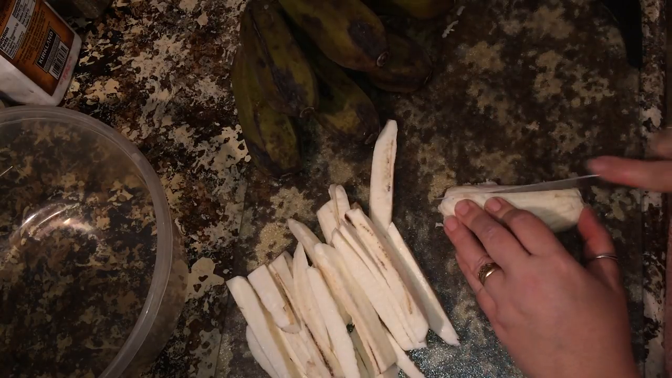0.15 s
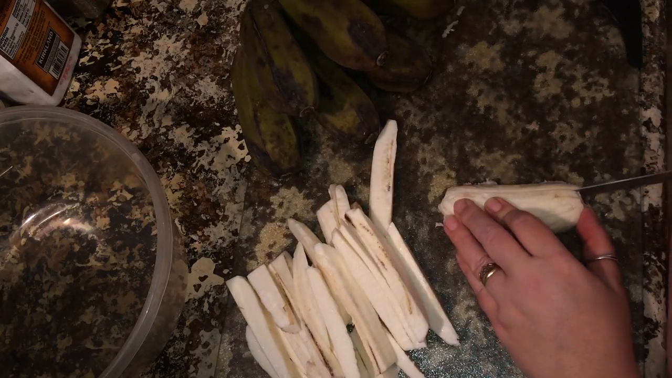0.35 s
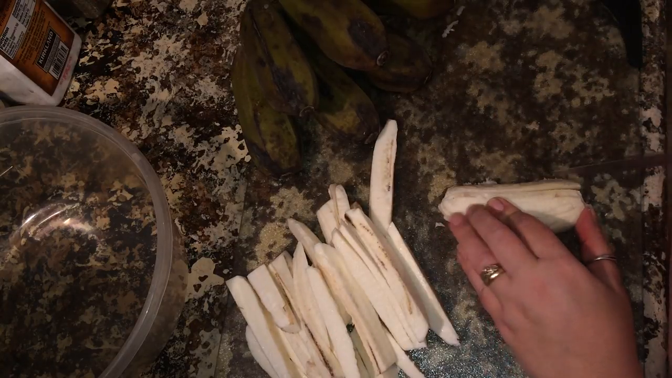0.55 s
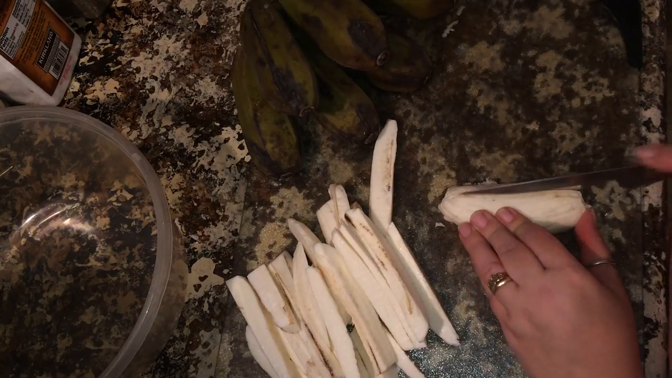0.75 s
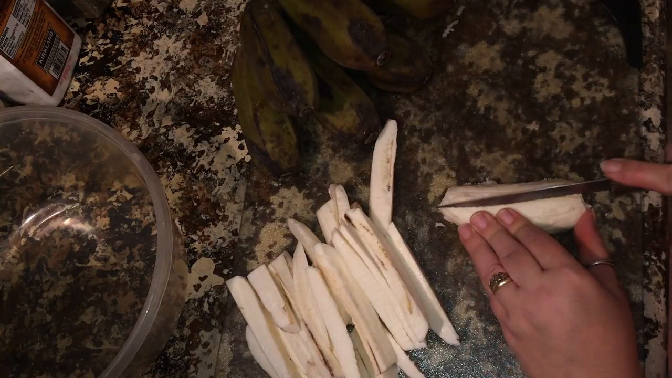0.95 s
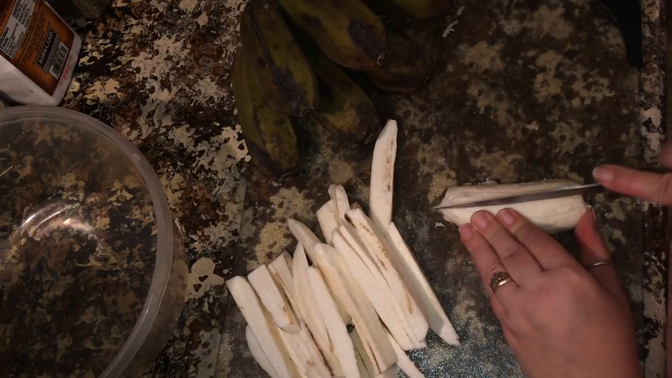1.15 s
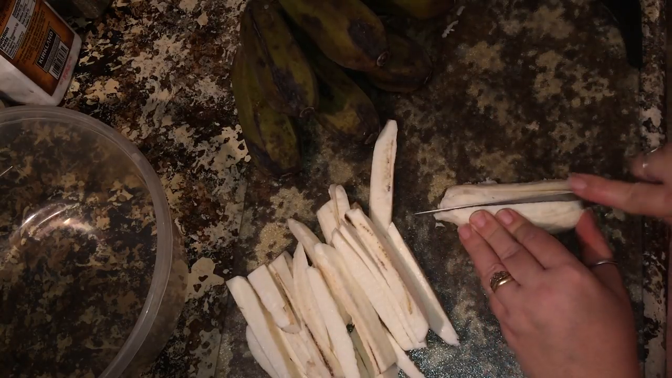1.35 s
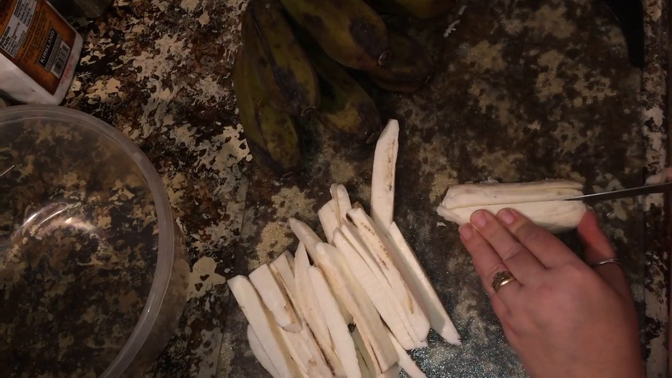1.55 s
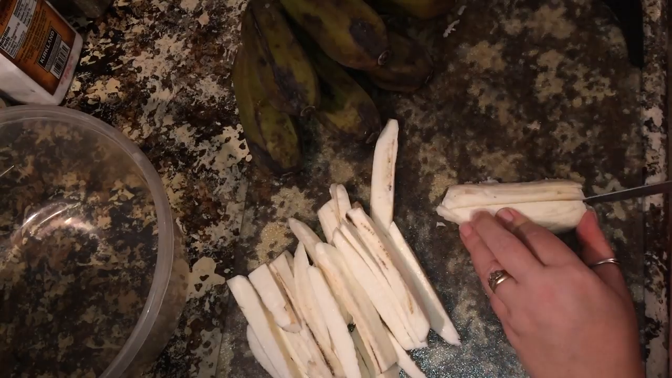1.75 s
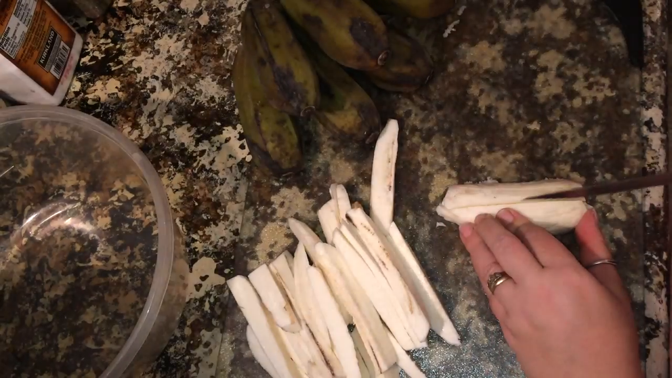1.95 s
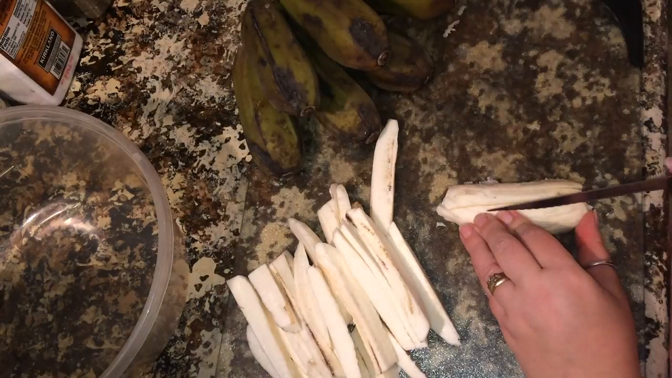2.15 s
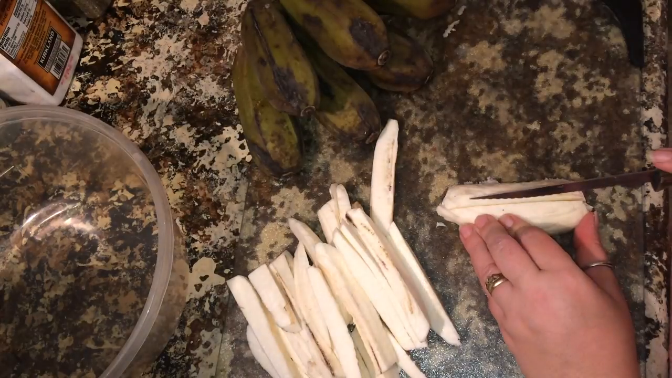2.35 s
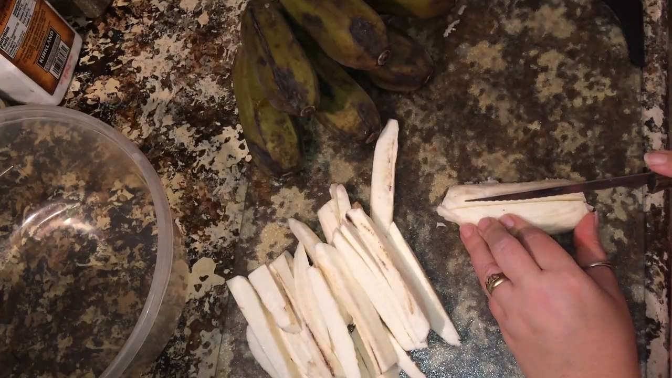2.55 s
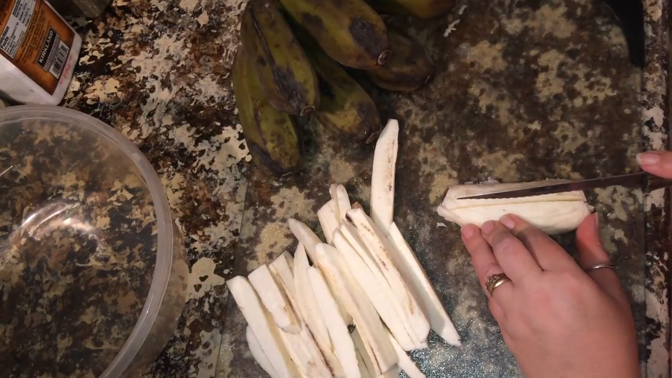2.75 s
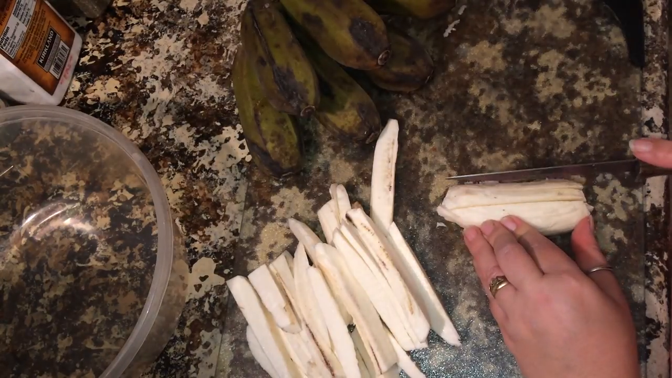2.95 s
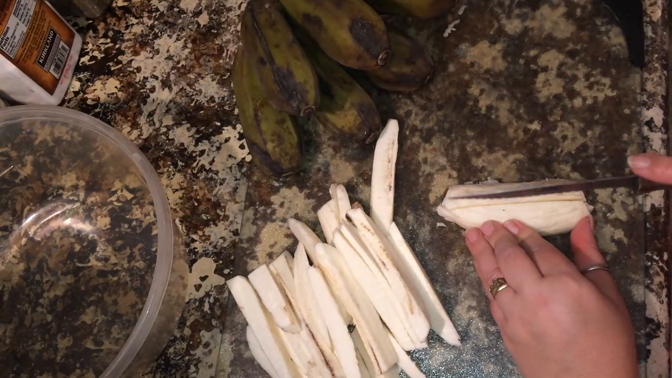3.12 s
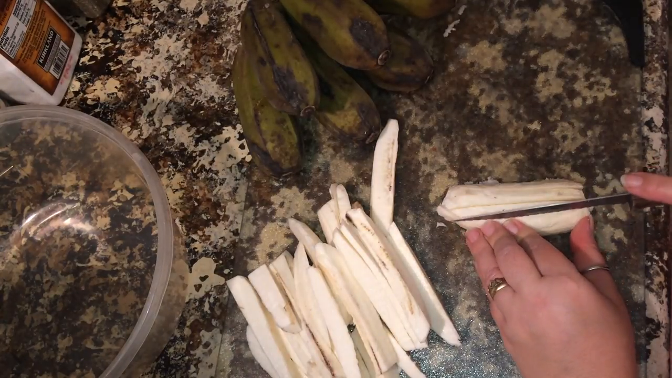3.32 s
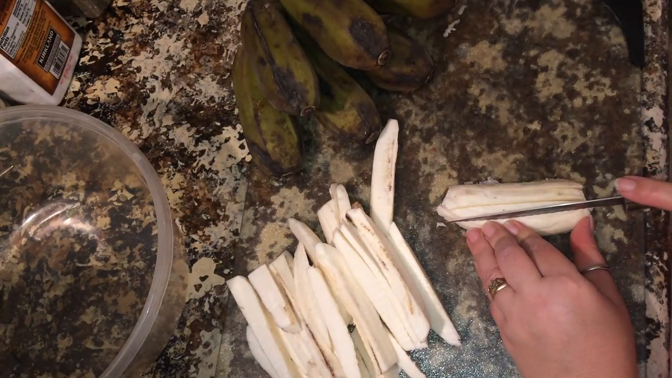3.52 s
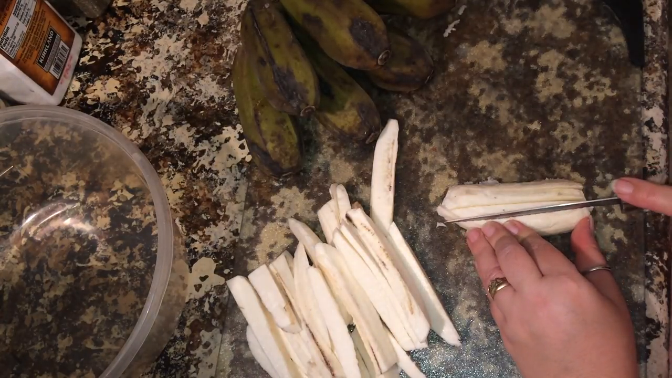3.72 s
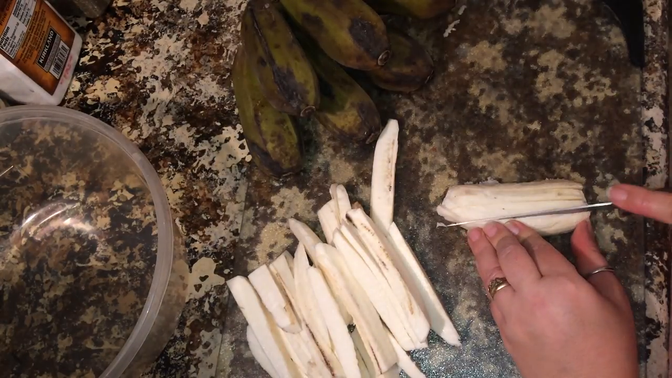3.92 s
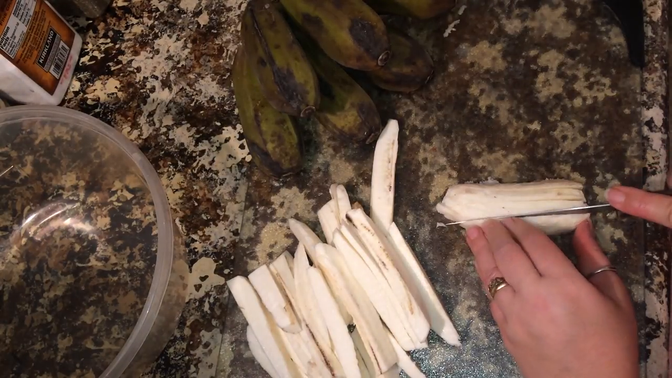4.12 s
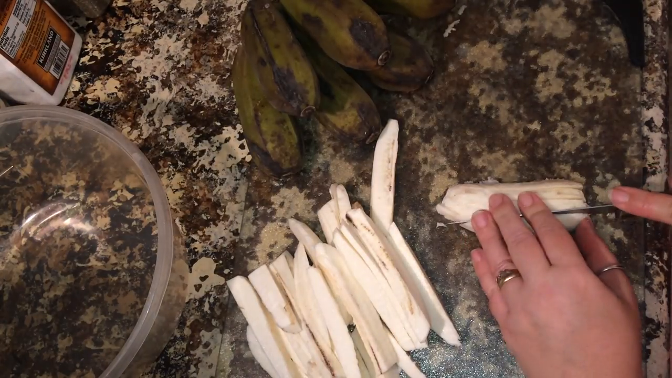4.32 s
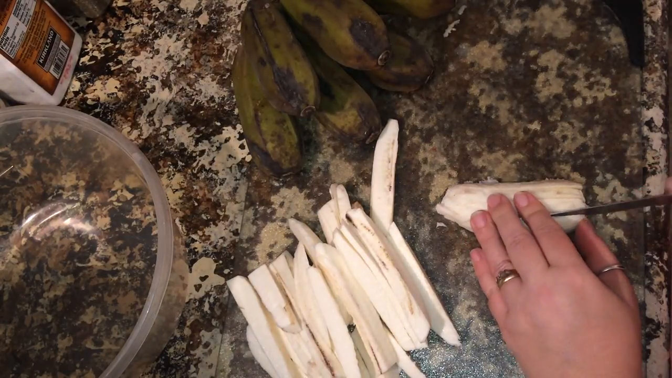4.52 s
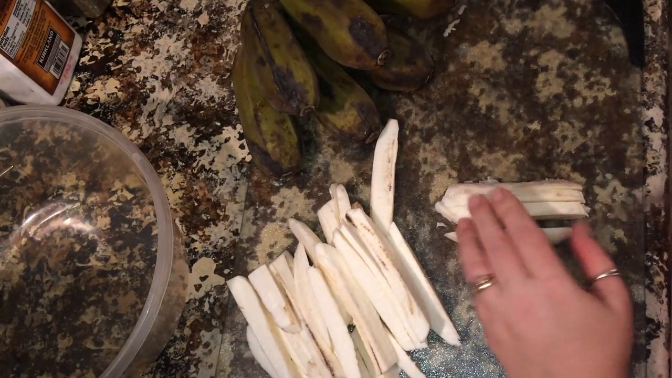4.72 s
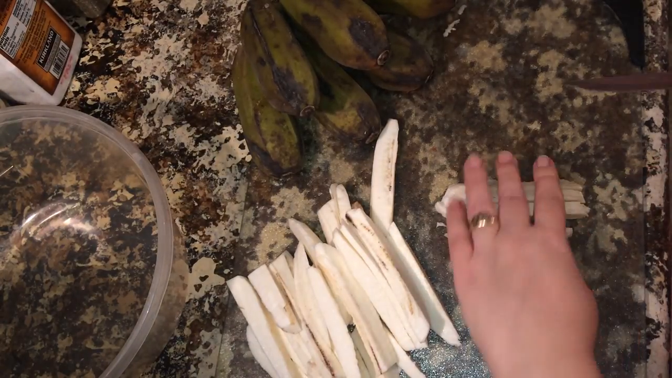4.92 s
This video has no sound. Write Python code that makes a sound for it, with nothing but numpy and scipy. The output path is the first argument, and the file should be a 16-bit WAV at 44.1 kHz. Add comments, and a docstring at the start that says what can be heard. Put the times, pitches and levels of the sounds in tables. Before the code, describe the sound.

A knife cuts a peeled banana three times on a hard board, each sharp click followed by a rasping scrape, over a faint appliance hum.

```python
"""An appliance hums in a small kitchen, and at once a knife starts on a peeled banana, cutting it
lengthwise three times on a hard, textured board. Each time the blade pushes through, clicks on the
board, grinds briefly under pressure and is drawn back in a rasping scrape as its edge sticks and slips.
Between cuts, moist flesh whispers along the blade. The near microphone turns down the loud strokes."""
import sys
import numpy as np
from scipy import signal
from scipy.fft import rfft, irfft, next_fast_len
from scipy.io import wavfile
from scipy.ndimage import uniform_filter1d, map_coordinates

SR = 44100
rng = np.random.default_rng(int(sys.argv[2]) if len(sys.argv) > 2 else 0)


def int16_out(signal):
    """Quantize to a 16-bit WAV file."""
    q = np.round(np.clip(np.atleast_2d(signal).T, -1, 1) * 32767)
    wavfile.write(sys.argv[1], SR, q.astype(np.int16))


N = 223621
TIME = np.arange(N) / SR
FFT_SIZE = next_fast_len(N + SR // 2, real=True) // 2 * 2
HZ = np.fft.rfftfreq(FFT_SIZE, 1 / SR)

# Tone of steel rubbing the board: pitch_hz, first_pull_db, second_pull_db, third_pull_db, tip_db, press_db
RUB_TONE = [(149, -31, -17, -22, -25.5, 3), (350, -26.5, -23.5, -23, -16, -20.5),
            (447, -6.5, -7, -18.0, -23, 2.5), (684, -12, -3, -9, -7.5, 2.5),
            (887, -16, -10.5, -18, -20, -8.5), (1276, -5.5, -6, -10, -20, 8),
            (1980, -4, -4.5, -2, -7.5, -10), (2450, -4.5, -6.5, -2, -7, -12.5),
            (2860, 0, -3.5, 1.5, -2, -5.5), (4600, -3, -3, 4, -12, -8), (5280, -4, -3, -2.5, -7, -17),
            (8500, 2, -3.5, -12.5, -11.5, -21), (11000, -0.5, -9.5, -16, -13, -20.5),
            (15300.0, -11, -21, -23.5, -25.5, -32)]


def amp(db):
    """Turn decibels into a gain."""
    return np.exp(np.asarray(db) * (np.log(10) / 20))


def unit(x):
    """Scale to an average (rms) level of 1."""
    return x / np.sqrt(np.mean(x ** 2) + 1e-20)


def curve(points, hz, column=0):
    """Read between a table's pitches; column 0 is the first after the pitch."""
    pitches, *values = np.transpose(points)
    return np.interp(np.log(hz + 1), np.log(pitches), values[column])


def near(hz, centre_hz, octaves):
    """A bell curve: 1 at the centre pitch, 0 far from it."""
    return np.exp(-.5 * (np.log2((hz + 1) / centre_hz) / octaves) ** 2)


def noise():
    """Fresh white noise."""
    return rng.standard_normal(N)


def wobble(per_s):
    """A smooth curve through per_s random values a second."""
    return map_coordinates(rng.standard_normal(int(N * per_s / SR) + 4), [TIME * per_s])


def filtered(x, response):
    """Make each frequency louder or softer as the response says."""
    return irfft(rfft(x, FFT_SIZE) * response, FFT_SIZE)[:N]


def shaped_noise(tone):
    """Noise of level 1, shaped by rows of pitch_hz, level_db."""
    return unit(filtered(noise(), amp(curve(tone, HZ))))


def appliance():
    """Steady fan noise and rumble, with slightly unsteady mains and motor tones."""
    # Mains and motor tones: pitch_hz, relative_db
    hum_tones = [(59.2, -63), (118.4, -56.5), (193.8, -62), (263.8, -65.5), (393.0, -60.5)]
    # Rush of the fan: pitch_hz, relative_db
    fan_tone = [(280, -24), (480, -6), (700, -3), (1000, -0.5), (1600, -3), (2300, -4.5), (2900, -11.5),
                (5000, -18.5), (8000, -24.5), (12000, -34), (15500, -36.5)]
    # Low rumble: pitch_hz, relative_db
    rumble_tone = [(20, -28), (45, -8), (62, -1.5), (80, -9), (100, -2.5), (122, -0.5), (150, -6.5),
                   (200, -4.5), (270, -9.5), (340, -9), (430, -8.5), (520, -15), (800, -50)]
    hum = np.zeros(N)
    for hz, db in hum_tones:
        level = amp(db + 1.4 * wobble(3.47)) * np.sqrt(2)
        hum += level * np.sin(2 * np.pi * hz * TIME + 0.57 * wobble(5.1))
    return amp(-1.5) * hum + amp(-51.5) * shaped_noise(fan_tone) + amp(-55) * shaped_noise(rumble_tone)


def board(tone_db):
    """How board and blade ring: their own pitches on top of the tone of a contact."""
    # Peaks and dips of board and blade together: pitch_hz, width_hz, lift_db
    resonances = [(252, 110, 17.5), (452, 85, 8), (734, 263, 11), (897, 203, 13), (1008, 40, 7),
                  (1494, 11, 14), (1795, 220, 9), (2216, 12, -3), (2319, 257, 15), (2525, 51, 8),
                  (2890, 60, 0.5), (2764, 87, 12), (2980, 93, 10), (3120, 38, 6.5), (3240, 53, 11),
                  (3442, 136, 10.5), (3643, 270, 6), (4450, 50, 7.5), (5180, 170, 8.5), (5630, 226, 9.5),
                  (6150, 740, 7), (7230, 280, 9), (8000, 400, 7.5), (8720, 314, 8.5), (9440, 190, 4.5)]
    lift_db = sum(db / (1 + (2 * (HZ - hz) / width) ** 2) for hz, width, db in resonances)
    gain = amp(tone_db + lift_db) * HZ ** 2 / (HZ ** 2 + 110 ** 2)  # a small board gives no deep bass
    # Minimum phase: the ringing follows the touch and never comes before it.
    cepstrum = irfft(np.log(unit(gain) + 1e-6))
    cepstrum[1:FFT_SIZE // 2] *= 2
    cepstrum[FFT_SIZE // 2 + 1:] = 0
    return np.exp(rfft(cepstrum))


def fade_db(start, end, rise_db_per_s, fall_db_per_s):
    """The level of a movement: it sets in, holds from start to end and dies away."""
    down_db = rise_db_per_s * np.maximum(start - TIME, 0) + fall_db_per_s * np.maximum(TIME - end, 0)
    return -np.minimum(down_db, 150)


def slips(per_s, spread_db, smooth_db, judder_db):
    """The edge sticks and slips on the board's texture: tiny uneven kicks over smooth rubbing."""
    kicks = (rng.random(N) < per_s / SR) * rng.choice([-1, 1], N)
    kicks = kicks * amp(spread_db * np.clip(noise(), -2, 1.5))
    return (unit(kicks) + amp(smooth_db) * noise()) * amp(judder_db * wobble(160))


def friction(force, response, start, end, body_db, hiss_db, effort_db):
    """Rubbing rings the board as low body, middle rasp and high hiss; more effort is louder and brighter."""
    ring = rfft(force, FFT_SIZE) * response
    low = 1 / (1 + (HZ / 1300) ** 8)
    high = 1 - 1 / (1 + (HZ / 4800) ** 8)
    touch_db = fade_db(start, end, rise_db_per_s=716, fall_db_per_s=713)
    touching = touch_db > touch_db.max() - 10
    bands = (low, body_db + 0.7 * effort_db), (1 - low - high, effort_db), (high, hiss_db + effort_db)
    sound = np.zeros(N)
    for band, db in bands:
        part = irfft(ring * band, FFT_SIZE)[:N]
        sound += part / np.std(part[touching]) * amp(db)
    return sound * amp(touch_db)


def pressing():
    """The blade is pushed through the last of the flesh, then grinds on the board."""
    # Pushes before and after the blade lands: start_s, end_s, relative_db (at the end), swell_db,
    # body_over_rasp_db, hiss_over_rasp_db
    presses = [(0.010, 0.075, -48.5, 2, 6.5, 0), (0.109, 0.132, -37, 1.5, 8, -6),
               (1.257, 1.346, -47, 10, 7.5, 4), (1.369, 1.392, -25.5, 0, -2, -6),
               (4.013, 4.057, -40.5, 2.5, 1.5, -2.5)]
    response = board(curve(RUB_TONE, HZ, column=4))
    grind = np.zeros(N)
    for start, end, db, swell_db, body_db, hiss_db in presses:
        force = slips(per_s=700, spread_db=6, smooth_db=6.5, judder_db=-2)
        effort_db = np.interp(TIME, [start, end], [-swell_db, 0])
        grind += amp(db) * friction(force, response, start, end, body_db, hiss_db, effort_db)
    return amp(-3.5) * grind


def jolts(rows, contact_s):
    """A burst of force for each start_s, level_db and optional ring_hz; longer contact fades slower."""
    force, t = np.zeros(N), TIME[:SR // 30]
    hz = np.fft.rfftfreq(len(t), 1 / SR)
    for start, db, *rings in rows:
        burst = rfft(rng.standard_normal(len(t)) * np.exp(-2 * t / contact_s))
        flat = burst / np.abs(burst)  # a hard contact drives all frequencies alike
        ring_db = sum(13.5 * near(hz, ring_hz, octaves=0.085) for ring_hz in rings)
        chatter = irfft(flat * amp(ring_db), len(t)) * np.exp(-.5 * t / contact_s)
        chatter *= np.sqrt(contact_s * SR) / 2 / np.linalg.norm(chatter)
        force[round(start * SR):][:len(t)] += amp(db) * chatter
    return force


def landings():
    """Steel meets the board with a sharp click."""
    # The edge lands: start_s, level_db, contact_s
    hits = [(0.0780, -10, 0.0079), (1.3488, -6.5, 0.0049), (4.0411, -4, 0.0042)]
    # Tone of each click: pitch_hz, first_db, second_db, third_db
    click_tone = [(150.0, -12, -25, -15), (323, -38, -32, -28), (430, -5.5, -6.5, -11), (706, -5, -6, -11),
                  (990, -7, -5.5, -12.5), (1256, -6.5, -7.5, -9), (1940, -8, -4, -13),
                  (2400, -0.5, -7, -6.5), (3020, -4.5, 0.5, -1.5), (4270, -14, -8.5, -3.5),
                  (5200, -5.5, -4.5, -1), (7460, -18, -2.5, -4), (11100, -11, -3.5, -8.5),
                  (15100, -26, -24.5, -18)]
    return sum(filtered(jolts([(start, db)], contact_s), board(curve(click_tone, HZ, column=cut)))
               for cut, (start, db, contact_s) in enumerate(hits))


def knocks():
    """The board knocks dully as the flesh gives way and the blade settles."""
    # Bumps of the blade: start_s, relative_db
    bumps = [(0.1083, -19.5), (0.1185, -18.5), (1.2645, -26.5), (1.3645, -8.5), (1.3735, -29.5),
             (1.3872, -21), (4.0035, -13)]
    # Their dull tone: pitch_hz, relative_db
    knock_tone = [(150, -18.5), (400, -13), (850, 6.5), (1400, -1), (2300, -5), (5000, -6), (9000, -3),
                  (15000, -5)]
    return amp(-10.5) * filtered(jolts(bumps, contact_s=0.0085), board(curve(knock_tone, HZ)))


def rolling_contact(force, roll_at_s, from_hz, to_hz, lift_db):
    """The touching point rolls along the blade, so the pitches it favours keep shifting."""
    roll_s, patchy_db = 0.023, 2
    hz, t, spectrum = signal.stft(force, SR, nperseg=512, noverlap=384)
    favoured_hz = from_hz + (to_hz - from_hz) * (1 + np.tanh((t - roll_at_s) / roll_s)) / 2
    favoured_db = lift_db * near(hz[:, None], favoured_hz, octaves=0.092)
    patches = uniform_filter1d(rng.standard_normal(spectrum.shape), size=3, axis=0)
    patches = unit(uniform_filter1d(patches, size=16, axis=1))
    blade_share = np.clip(hz[:, None] / 2000, 0, 1)  # low pitches belong to the board and stay put
    spectrum *= amp(favoured_db + patchy_db * blade_share * patches)
    return signal.istft(spectrum, SR, nperseg=512, noverlap=384)[1][:N]


def pull(row, force, response):
    """One pull of the knife: effort swells to the hardest moment, where the contact rolls on, then eases."""
    start, hardest, end, db, swell_db, ease_db, body_db, hiss_db, from_hz, to_hz, lift_db = row
    effort_db = np.interp(TIME, [start, hardest, end], [-swell_db, 0, -ease_db])
    force = rolling_contact(force, hardest, from_hz, to_hz, lift_db)
    return amp(db + 1) * friction(force, response, start, end, body_db, hiss_db, effort_db)


def scrapes():
    """The edge is drawn back over the board, catching here and there; twice the tip drags after it."""
    # Pulls of the edge: start_s, hardest_s, end_s, relative_db (at the hardest), swell_db, ease_db,
    # body_over_rasp_db, hiss_over_rasp_db, favoured_from_hz, favoured_to_hz, favoured_lift_db
    edge_pulls = [(0.240, 0.332, 0.44, -20.5, 9, 4.5, -7, -4, 3370, 3250, 3),
                  (1.485, 1.555, 1.755, -22, 7, 16.5, -6.5, -2.5, 2900, 2420, -1.5),
                  (4.494, 4.668, 4.783, -15, 18, 11, -10.5, -6.5, 4420, 3080, 4.5)]
    # The edge catches and lets go, ringing the blade: start_s, relative_db, ring_hz
    catches = [(0.2230, -17.5, 5540), (0.249, -12, 2430), (0.2820, -15, 5560), (0.3290, -5, 3060),
               (0.3357, -0.5, 3070), (0.377, -11.5, 3200), (0.39, -2, 5460), (1.4828, -14.5, 834),
               (1.4975, -13, 5470), (1.5518, -10, 2800), (1.5762, -3.5, 2900), (1.6153, -13, 5600),
               (1.6350, -11.5, 5240), (1.6832, -13, 6900), (1.7484, -15.5, 6900), (1.7930, -18.5, 2980),
               (4.4873, -16.5, 4280), (4.552, -18, 5530), (4.596, -19.5, 4450), (4.6550, 1, 4500),
               (4.6870, -8.5, 3300), (4.6926, -5.5, 3280), (4.7219, -4.5, 3000), (4.768, -9, 7250)]
    # The tip drags alone: same columns as edge_pulls
    tip_drags = [(0.461, 0.502, 0.5324, -31.5, 1.5, 0, -7.5, -10.5, 3000, 2850, 8.2),
                 (1.736, 1.792, 1.84, -30.5, 4, 1, -10.5, -9.5, 3650, 2970, 9.5)]
    sound = np.zeros(N)
    for cut, row in enumerate(edge_pulls):
        response = board(curve(RUB_TONE, HZ, column=cut))
        sound += pull(row, slips(per_s=1700, spread_db=4.5, smooth_db=-1.5, judder_db=2.1), response)
        hardest_s = row[1]
        own_catches = [catch for catch in catches if abs(catch[0] - hardest_s) < .5]
        sound += amp(-6) * filtered(jolts(own_catches, contact_s=0.007), response)
    tip_response = board(curve(RUB_TONE, HZ, column=3))
    for row in tip_drags:
        sound += pull(row, slips(per_s=700, spread_db=1, smooth_db=-0.5, judder_db=2.4), tip_response)
    return sound


def slicing():
    """Moist flesh whispers as the flat of the blade slides through it."""
    # Slides through the banana: start_s, end_s, level_db
    slides = [(0.678, 0.690, -55), (2.666, 2.970, -67.5), (4.23, 4.427, -65.5)]
    # Tone of the whisper: pitch_hz, relative_db
    flesh_tone = [(1500, -29), (4000, 11.5), (8000, 3.5), (14000, -4)]
    level = sum(amp(db + fade_db(start, end, rise_db_per_s=1200, fall_db_per_s=137))
                for start, end, db in slides)
    return level * amp(1.7 * wobble(60)) * shaped_noise(flesh_tone)


def kitchen_echo(x):
    """The walls throw back a short wash of sound; each pitch dies at its own speed."""
    # Time the echo takes to fall by 60 dB: pitch_hz, fade_s
    fade_times = [(300, 0.38), (800, 0.25), (2100, 0.27), (5500, 0.3), (9000, 0.27), (15000, 0.17)]
    hz, t, spectrum = signal.stft(rng.standard_normal(SR // 2), SR, nperseg=256)
    spectrum *= amp(-60 * t / curve(fade_times, hz)[:, None])
    tail = signal.istft(spectrum, SR, nperseg=256)[1]
    tail = np.pad(tail / np.linalg.norm(tail), (round(.004 * SR), 0))  # arrives 4 ms late
    return signal.fftconvolve(x, tail)[:N]


def scene():
    """Knife, room and hum at one microphone."""
    clicks = landings()
    rubbing = pressing() + knocks() + scrapes()
    echo = kitchen_echo(amp(-9) * clicks + amp(-15.5) * rubbing)
    return (clicks + rubbing + echo + slicing() + appliance())[None]


def gain_control(x, threshold_db, slope, recover_db_per_s):
    """The microphone turns itself down on loud sound, then slowly back up."""
    level_db = 10 * np.log10(np.abs(uniform_filter1d(x ** 2, size=441)) + 1e-12)
    cut_db = np.maximum(level_db - threshold_db, 0) * slope
    recovery_db = recover_db_per_s * TIME
    held_db = np.maximum.accumulate(cut_db + recovery_db) - recovery_db
    return x * amp(-uniform_filter1d(held_db, size=221, origin=110))


def record(dry):
    """Turn down loud strokes, round off the peaks and drop the highest treble."""
    levelled = gain_control(dry[0], threshold_db=-19.5, slope=0.54, recover_db_per_s=10)
    rounded = levelled / (1 + np.abs(levelled / .78) ** 4) ** (1 / 4)
    return filtered(rounded, HZ < 15750)[None]


dry = scene()
out = record(dry)
int16_out(out)
```